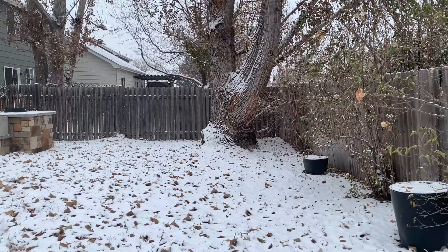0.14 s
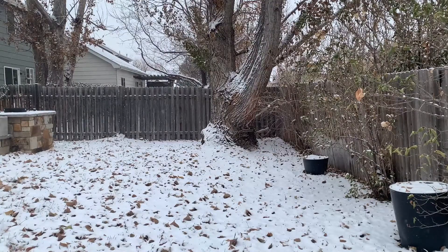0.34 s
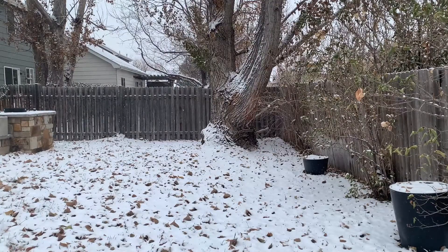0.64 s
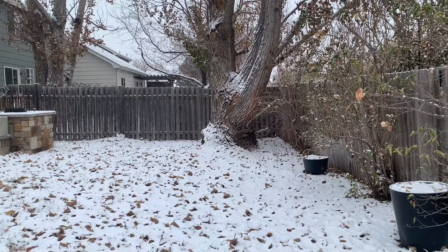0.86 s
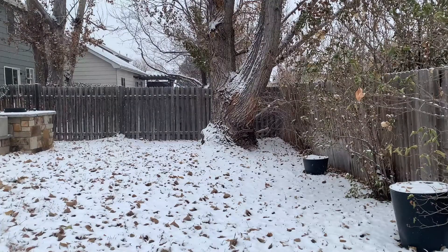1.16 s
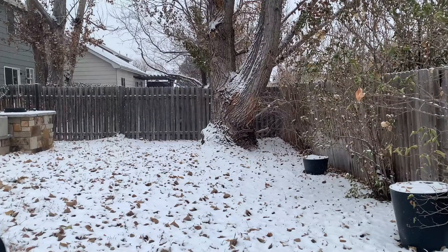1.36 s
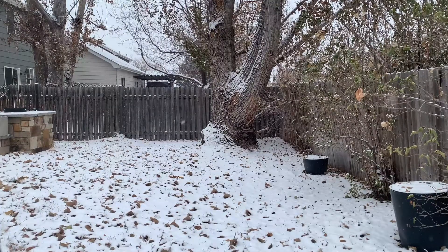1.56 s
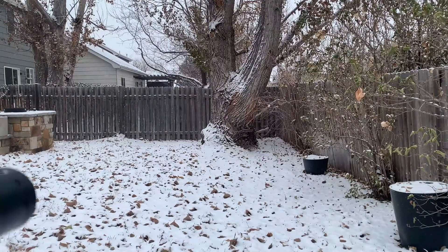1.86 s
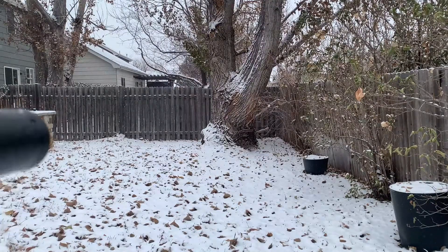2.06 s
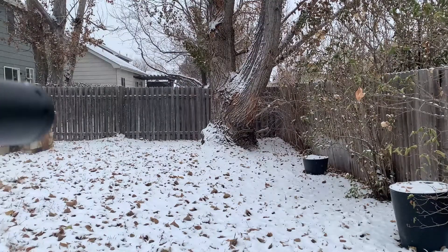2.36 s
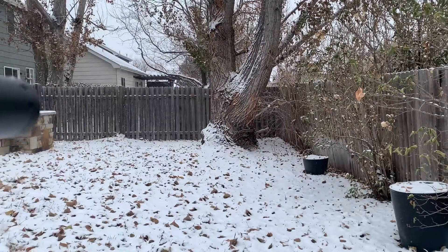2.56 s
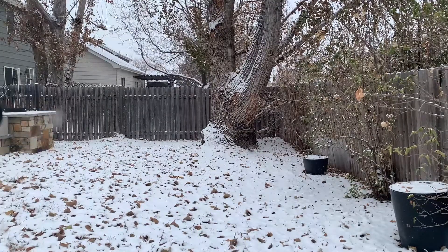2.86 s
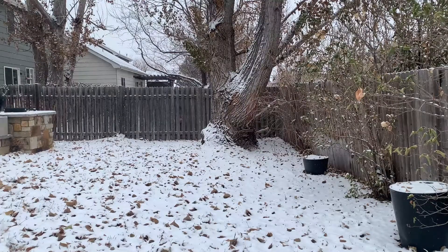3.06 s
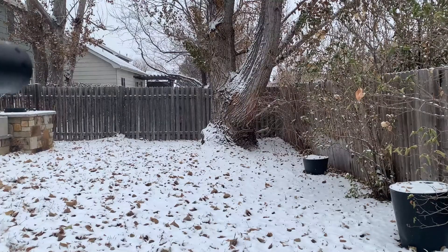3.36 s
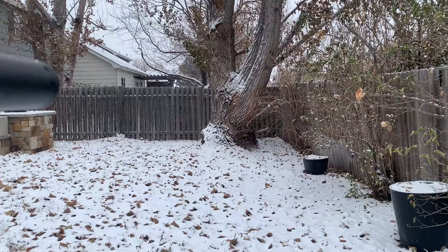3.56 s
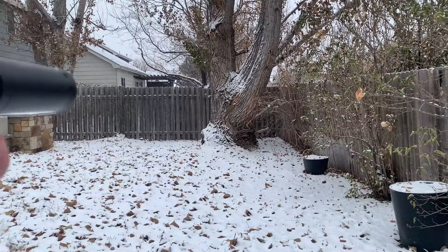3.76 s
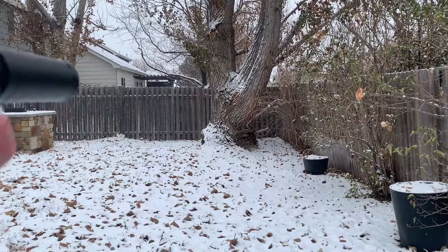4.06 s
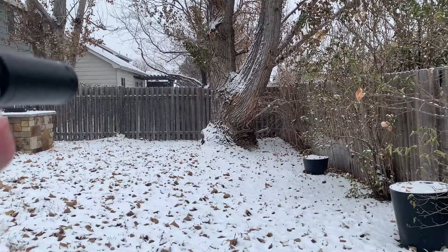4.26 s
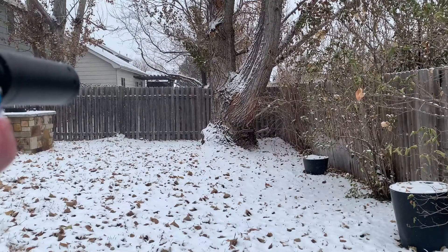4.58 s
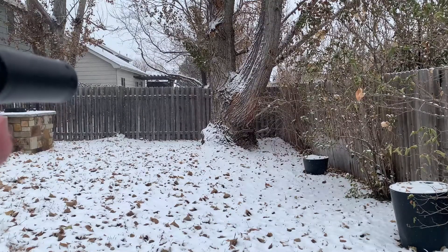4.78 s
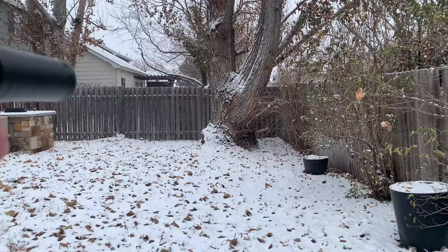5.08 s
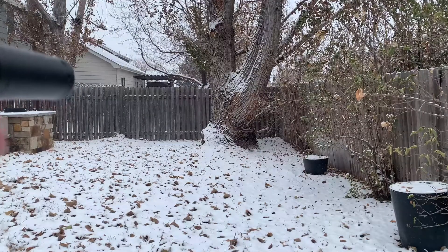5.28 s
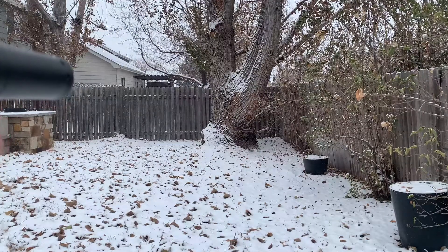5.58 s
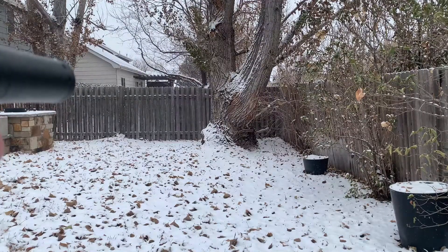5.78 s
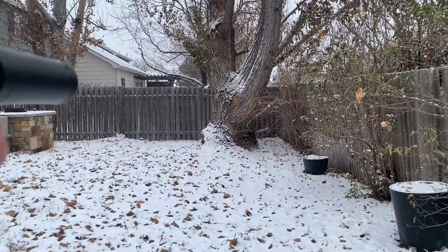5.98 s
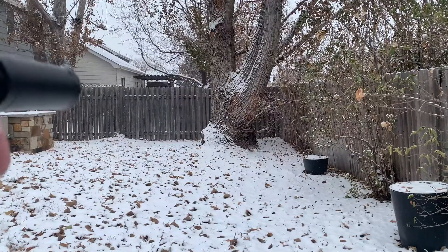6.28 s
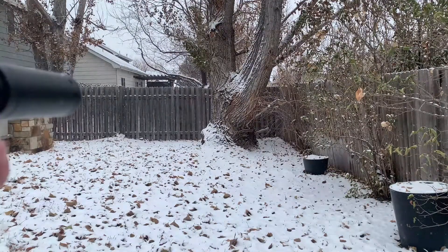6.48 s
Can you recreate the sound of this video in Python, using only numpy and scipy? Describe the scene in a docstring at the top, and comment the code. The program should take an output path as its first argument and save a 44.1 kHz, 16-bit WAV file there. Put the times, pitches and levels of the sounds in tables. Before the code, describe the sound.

In a still, snow-covered yard with a faint far-off town rumble, a motorized toy gun shoots seven bursts of fast, snapping pops, close by and just left of the microphone. Its motor whines up and its plastic gears rattle with each burst, then coast and tick to rest. Three bursts come, then a pause of about a second, then four more with brighter gear noise, including one long run. The sound is dry.

```python
"""Faint ticks of settling gears, then an electric gel blaster fires the first of seven bursts, close by and
just left of a phone's two microphones in a quiet, snowy yard. Its motor winds a spring through whining,
rattling plastic gears and sags under the load; once a turn the piston slams home, cracks and pops the air
in the barrel. Between bursts the gears coast and tick to rest. The snow leaves little echo; far off,
a town rumbles."""
import sys
import numpy as np
from scipy import signal
from scipy.fft import rfft, irfft
from scipy.io import wavfile
from scipy.ndimage import uniform_filter1d

SR = 44100
rng = np.random.default_rng(int(sys.argv[2]) if len(sys.argv) > 2 else 0)


def pcm_store(signal):
    """Save signal as 16-bit PCM."""
    levels = np.round(np.clip(np.atleast_2d(signal), -1, 1) * 32767)
    wavfile.write(sys.argv[1], SR, levels.astype(np.int16).T)


N = 292383
TIME = np.arange(N) / SR
RING = np.arange(4096) / SR  # time axis of one short sound
PORT_LAG_S = .000295  # the sound reaches the left microphone port first


def undb(db):
    """Decibels to gain."""
    return 10 ** (np.asarray(db) / 20)


def unit(x):
    """Scale to rms 1."""
    return x / np.sqrt(np.mean(x ** 2))


def fade(t60):
    """Exponential decay, 60 dB down after t60 seconds."""
    return np.exp(-np.log(1000) * RING / t60)


def pan(db):
    """Microphone gains for a level difference, left minus right."""
    return undb(np.array([[1], [-1]]) * db / 2)


def delay(x, s):
    """Shift a sound later by any fraction of a sample."""
    size = x.shape[-1]
    return irfft(rfft(x) * np.exp(-2j * np.pi * np.fft.rfftfreq(size, 1 / SR) * s), size)


def ports(x, lag_s, pan_db):
    """A source on the left reaches the right microphone port later and weaker."""
    return np.array([x, delay(x, lag_s)]) * pan(pan_db)


def band(x, lo_hz, hi_hz, order=2):
    """Causal band-pass."""
    sos = signal.butter(order, [lo_hz, min(hi_hz, .45 * SR)], "band", fs=SR, output="sos")
    return signal.sosfilt(sos, x)


def colour(x, hz, db):
    """Shape a sound's spectrum through (Hz, dB) points, at rms 1."""
    f = np.maximum(np.fft.rfftfreq(N, 1 / SR), 1)
    return unit(irfft(rfft(x) * undb(np.interp(np.log(f), np.log(hz), db)), N))


def walk(rate_hz):
    """Smooth random drift at rms 1."""
    size = max(int(SR / rate_hz), 2)
    return unit(uniform_filter1d(uniform_filter1d(rng.standard_normal(N), size), size))


def add(out, s, sound):
    """Mix a short sound in at time s."""
    i = max(int(round(s * SR)), 0)
    part = sound[..., :max(N - i, 0)]
    out[..., i:i + part.shape[-1]] += part


# the distant town, heard from the yard: f/Hz, relative spectral level/dB
TOWN_SPECTRUM = [(25, -3), (55, 4), (100, -1), (250, -6), (500, -8), (800, -7), (1200, -12), (2000, -13),
                 (3200, -21), (8000, -24), (15000, -33)]


def town(air_db=-71.5, hum_db=-67):
    """Far off: a faint rumble, much the same at both microphones, and a low hum that wavers."""
    noise = rng.standard_normal(N) + .6 * rng.standard_normal((2, N))
    air = colour(noise, *np.transpose(TOWN_SPECTRUM))
    hum = unit(band(rng.standard_normal(N), 49, 56))
    return air * undb(air_db + 1.5 * walk(5)) + hum * undb(hum_db)


def yard(x, t60_s=.5, wet_db=-40, house_s=.178, house_db=-54):
    """Snow swallows most echoes: faint scatter from fence and trees, one slap from a house 30 m off."""
    t = np.arange(SR) / SR
    scatter = band(rng.standard_normal((2, SR)), 350, 4000, order=1)
    scatter *= np.exp(-np.log(1000) * t / t60_s) * (t > .012)
    scatter *= undb(wet_db) / np.sqrt(np.sum(scatter ** 2) / 2)
    out = signal.fftconvolve(x, scatter, axes=1)[:, :N]
    add(out, house_s, undb(house_db) * band(x, 500, 3000))
    return out


# the latch as the gears settle, near the phone: t/s, relative level/dB
LATCH_TICKS = [(0.0857, -36), (0.1106, -42), (0.1274, -44), (0.6639, -38), (0.6908, -36), (1.749, -46),
               (1.8013, -49), (1.8771, -50), (2.3989, -36), (2.4803, -49), (2.5696, -45), (3.9908, -46),
               (5.718, -48), (6.2088, -36), (6.2337, -42), (6.3046, -47), (6.3959, -44)]


def latch():
    """The latch ticks and rebounds as the spring pushes the gears back."""
    ticks = np.zeros((2, N))
    decay = fade(.012) + .12 * fade(.07)
    for s, db in LATCH_TICKS:
        for late_s, hit_db in ((0, -2), (.011, -11)):
            add(ticks, s + late_s, undb(db + hit_db) * decay * rng.standard_normal((2, len(RING))))
    return 1.7 * band(ticks, 1700, 5500)


# taps on the grip, alike at both microphones: t/s, relative level/dB
GRIP_TAPS = [(3.012, -44), (3.312, -46)]


def grip():
    """The grip taps softly while the blaster is shifted."""
    taps = np.zeros(N)
    for s, db in GRIP_TAPS:
        add(taps, s, undb(db) * fade(.03) * rng.standard_normal(len(RING)))
    return 2.2 * band(taps, 200, 1400, order=4)


# bursts of fire: trigger pulled t/s, released t/s, first shot t/s, number of shots,
# first turn/s, steady turn/s, last turn/s, quickening per turn/s
TRIGGER_PULLS = [(.18, .525, .2265, 5, .0823, .0758, .0756, 0),
                 (.755, 1.603, .7987, 12, .0806, .0755, .0766, 0),
                 (1.955, 2.193, 2.0208, 4, .0783, .0743, .0863, 0),
                 (3.502, 3.833, 3.5868, 4, .0771, .075, .0772, 0),
                 (4.014, 5.511, 4.0835, 21, .0791, .07433, .087, .000086),
                 (5.776, 6.095, 5.8614, 4, .0759, .0733, .0761, 0),
                 (6.447, 6.7, 6.5183, 2, .0775, .075, .0775, 0)]


def shot_times():
    """One shot per gear turn: the first turn is slow from rest, the last mostly drags on release."""
    times = []
    for _, _, first, count, first_turn, turn, last_turn, quickening in TRIGGER_PULLS:
        turns = turn - quickening * (np.arange(round(count) - 1) - 1)
        turns[0], turns[-1] = first_turn, last_turn
        times.extend(first + np.r_[0, np.cumsum(turns)])
    return np.array(times)


def motor(spin_up_s=.034, coast_s=.074, turn_s=.075):
    """The motor spins up and coasts: its speed (0-1) and the count of gear turns, whole at each shot."""
    earlier_pull = (-.3, -.04)  # still dying away at the start
    speed = np.zeros(N)
    for on, off in [earlier_pull] + [pull[:2] for pull in TRIGGER_PULLS]:
        spin_up = 1 - np.exp(-np.maximum(TIME - on, 0) / spin_up_s)
        speed += spin_up * np.exp(-(np.maximum(TIME - off, 0) / coast_s) ** 2)
    travel = np.cumsum(speed + 1e-9) / SR
    marks = np.interp(shot_times(), TIME, travel)
    marks = np.r_[-turn_s / 2, marks, marks[-1] + turn_s]
    return speed, np.interp(travel, marks, np.arange(len(marks)))


def shaken(shake_db=-5, settle_s=.062):
    """Envelope of loose parts rattling on for a moment after each blow of the piston."""
    ages = (TIME - s for s in shot_times())
    shakes = [(age > 0) * np.exp(-np.minimum(np.abs(age) / settle_s, 10) ** 2) for age in ages]
    return undb(shake_db) * np.max(shakes, axis=0)


# gearbox rattle at the phone: f/Hz, relative spectral level/dB with the blaster held back, held forward
RATTLE_SPECTRUM = [(60, -18, -16), (140, -12, -8), (200, -6, 5), (380, -6, 0), (520, -2, 2), (790, 7, 9),
                   (1220, -4, 8), (1680, 15, 23.5), (2050, 14.5, 19.5), (2750, 11, 12.5), (3250, -9, -5),
                   (4400, 7, 15), (6600, -1.5, 1), (8200, -5, 3), (9500, -8.5, -1), (15000, -17, -5.5)]


def gear_rattle(teeth, forward, grit_db=4.8, forward_db=5.6, spread=.5):
    """Teeth strike with uneven force, heard straight from the gearbox and from all over the shell."""
    strikes = np.diff(np.floor(teeth), prepend=0) * rng.standard_normal(N)
    strikes *= undb(grit_db * rng.standard_normal(N))
    direct = unit(strikes) * .75 + rng.standard_normal(N)
    rub = ports(direct, PORT_LAG_S, 1.6) + spread * rng.standard_normal((2, N))
    hz, back_db, front_db = np.transpose(RATTLE_SPECTRUM)
    held_back = colour(rub, hz, back_db)
    held_forward = undb(forward_db) * colour(rub, hz, front_db)
    return (1 - forward) * held_back + forward * held_forward


def pinion_whine(teeth, shaft, speed, forward, whine_db, braking=.45, octave_db=-5):
    """The pinion runs slightly off centre, so its mesh tone throbs once a revolution."""
    # the teeth press hardest while the motor gathers speed, less so while the spring brakes it
    strain = np.where(np.gradient(speed) > 0, 1, braking) * (1 - speed)
    force_db = whine_db + 29 * strain * (.25 + forward) + 2 * walk(200) + .8 * walk(12)
    force = (1 + .3 * shaft) * undb(force_db) * speed ** 2
    mesh, octave = np.sin(2 * np.pi * teeth), np.sin(4 * np.pi * teeth)
    # the shell radiates near its resonance; at half speed the octave slides through it instead
    tone = band(mesh * force + undb(octave_db) * speed * (1 - speed) * octave, 1750, 3200, order=3)
    tone += undb(-25 + 14 * forward) * band(octave * force, 3800, 5700)
    held_back = ports(tone * (1 - forward) * undb(-25.3), lag_s=.00036, pan_db=2)
    held_forward = ports(tone * forward * undb(-31), lag_s=.00036, pan_db=7)
    return held_back + held_forward


# one turn of the sector gear: share of the turn, full-speed mesh f/Hz, relative whine, rattle level/dB
GEAR_TURN = [(0, 2390, -14, -1), (.11, 2500, -20, -1), (.22, 2890, -8, 0), (.36, 2830, 0, 0),
             (.6, 2675, 0, 0), (.9, 2440, 0, .5), (1, 2390, -14, -1)]


def gears(speed, turns, forward, rattle_db=-33.3, hum_db=-57, pinion_teeth=9):
    """Close up, the gears rattle and whine, sagging as the spring tightens; the shaft shakes the shell."""
    share, *columns = np.transpose(GEAR_TURN)
    mesh_hz, whine_db, load_db = (np.interp(turns % 1, share, c) for c in columns)
    flutter = 1 + (.014 + .012 * forward) * walk(450) + .008 * walk(15)
    teeth = np.cumsum(mesh_hz * speed * flutter) / SR
    shaft = np.sin(2 * np.pi * teeth / pinion_teeth)
    rattle = gear_rattle(teeth, forward)
    rattle *= undb(rattle_db + load_db + 1.5 * walk(250)) * np.maximum(speed ** .9, shaken())
    whine = pinion_whine(teeth, shaft, speed, forward, whine_db)
    hum = shaft * speed ** 2 * undb(hum_db + 5 * forward + 2 * walk(40))
    return rattle + whine + hum


# rack engages, latch, nozzle, rack slips free: share of the turn, relative clatter, shell ring level/dB
ACTION_KNOCKS = [(.225, -22, -26), (.32, -28, -26), (.555, -25, -19.5), (.925, -16, -22)]


def knocks(speed, turns, shell_hz=1720):
    """Parts of the action knock at set places in each turn, softer when it runs slowly."""
    out = np.zeros((2, N))
    shell = band(np.sin(2 * np.pi * shell_hz * RING) * fade(.015), 700, 4000)
    for share, clatter_db, shell_db in ACTION_KNOCKS:
        passes = np.diff(np.floor(turns - share), prepend=np.floor(turns[0] - share))
        blows = passes * speed ** 2 * undb(2.2 * rng.standard_normal(N))
        clatter = signal.fftconvolve(blows, fade(.013))[:N] * rng.standard_normal((2, N))
        out += undb(clatter_db) * band(clatter, 1300, 5000, order=1)
        out += undb(shell_db) * ports(signal.fftconvolve(blows, shell)[:N], lag_s=.00042, pan_db=4)
    return out


# overtones of the struck barrel: f/Hz, relative level/dB, t60/s, left minus right microphone/dB
BARREL_OVERTONES = [(1130, -22.5, .008, 9), (1750, -14, .012, 5), (2330, -12, .011, 2),
                    (3800, -15.5, .012, 1), (5250, -7, .0055, -3.5), (6600, -9.5, .003, -4),
                    (7800, -11, .0028, -2)]


def crack(detune, click_db=-4.5):
    """The piston head hits the cylinder: a bare click and the barrel's overtones."""
    ring = sum(undb(db) * pan(lr_db) * np.sin(2 * np.pi * hz * detune * RING) * fade(t60)
               for hz, db, t60, lr_db in BARREL_OVERTONES)
    left, right = ring + undb(click_db) * (RING == 0)
    return np.array([left, delay(right, .000312)])


# air in the barrel, the pulse itself and then the tube's own note:
# f/Hz, relative level/dB, t60/s, swell/s, left minus right microphone/dB
BARREL_AIR = [(606, 21.4, .0069, .0033, 2.5), (839, -8.6, .032, .0004, 7)]


def pop(detune, linger, puff_db=-13, puff_late_s=.0038, puff_s=.00075):
    """The air pulse swells in the barrel and rings on; a last puff from the muzzle adds a low thump."""
    ring = np.zeros((2, len(RING)))
    for k, (hz, db, t60, swell_s, lr_db) in enumerate(BARREL_AIR):
        envelope = fade(t60 * linger) * (1 - np.exp(-(RING / swell_s) ** 2))
        ring += (-1) ** k * undb(db) * pan(lr_db) * np.sin(2 * np.pi * hz * detune * RING) * envelope
    puff = undb(puff_db) * np.exp(-((RING - puff_late_s) / puff_s) ** 2)
    left, right = band(puff - ring, 168, 16000)
    return np.array([left, delay(right, .0003)])


def shots(lead_s=.0004, air_lead_s=.00059, rush_s=.0012, squeeze_s=.007, die_s=.0015, rebound_s=.0045,
          squeeze_db=-12, scrape_db=-14.5, crack_db=1, rebound_db=-26):
    """Just left of the phone, the piston squeezes the air, scrapes, strikes, pops it out and rebounds."""
    out, scrape, squeeze = np.zeros((2, N)), np.zeros(N), np.zeros(N)
    around = RING - RING[-1] / 4  # time before and after the strike
    rush, press = (np.exp(np.minimum(around / rise_s, -around / die_s)) for rise_s in (rush_s, squeeze_s))
    for s in shot_times():
        # no two strokes are quite alike
        pop_pitch, crack_pitch, linger, bounce, late, pop_force, crack_force = rng.standard_normal(7)
        air = undb(.5 * pop_force) * pop(1 + .014 * pop_pitch, 1 + .04 * linger)
        blow = undb(.9 * crack_force)
        add(out, s - air_lead_s, air)
        add(out, s + rebound_s + .0005 * late, undb(rebound_db + 3 * bounce) * air)
        add(out, s - lead_s, undb(crack_db) * blow * crack(1 + .014 * crack_pitch))
        add(scrape, s - lead_s + around[0], blow * rush)
        add(squeeze, s - lead_s + around[0], blow * press)
    out += undb(squeeze_db) * ports(band(squeeze * rng.standard_normal(N), 500, 1150), PORT_LAG_S, 4)
    return out + undb(scrape_db) * band(scrape * rng.standard_normal((2, N)), 700, 9000, order=1)


def scene():
    """The blaster close by, the yard around it, the town far behind."""
    # in the long pause the blaster is pushed forward, level with the phone, and its gears sound brighter
    forward = np.clip((TIME - 2.9) / .5, 0, 1)
    speed, turns = motor()
    blaster = shots() + gears(speed, turns, forward) + knocks(speed, turns) + latch() + grip()
    return blaster + yard(blaster) + town()


def record(dry, ceiling=.88, bass_hz=68, top_hz=15900):
    """The phone rounds the loudest peaks and cuts the deep bass and the top."""
    rounded = dry / (1 + (dry / ceiling) ** 6) ** (1 / 6)
    thinned = signal.sosfilt(signal.butter(2, bass_hz, "high", fs=SR, output="sos"), rounded)
    return signal.sosfilt(signal.ellip(8, .2, 80, top_hz, fs=SR, output="sos"), thinned)


dry = scene()
out = record(dry)
pcm_store(out)
```